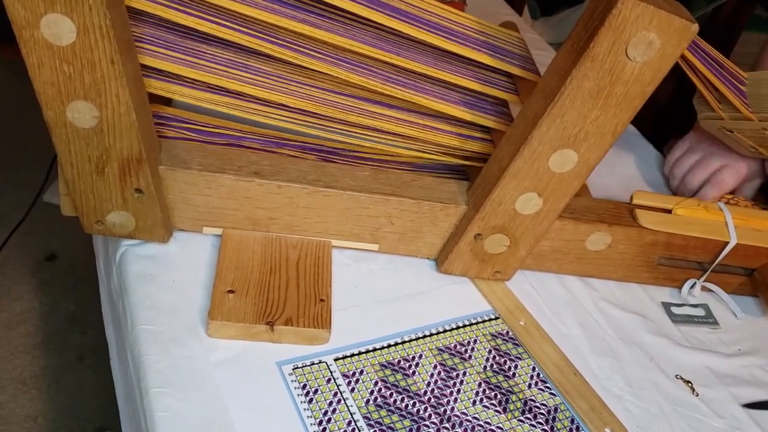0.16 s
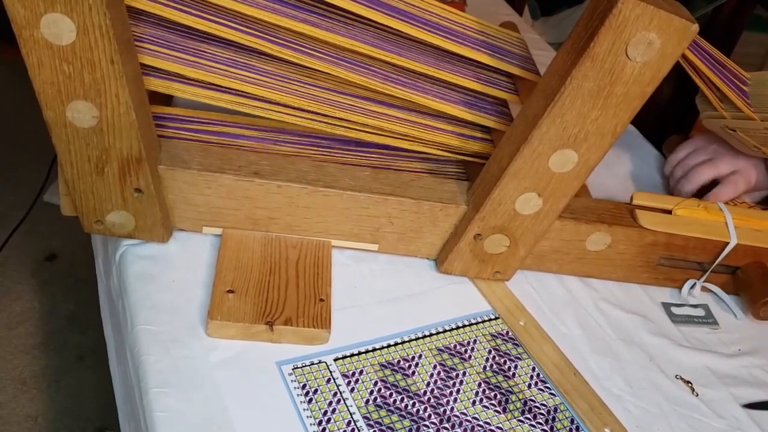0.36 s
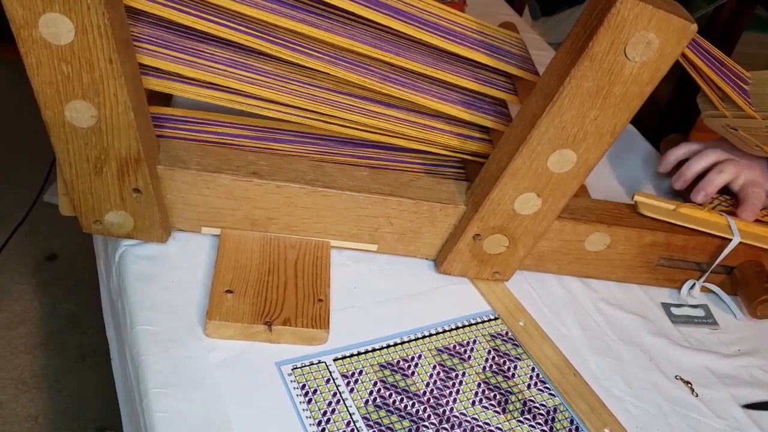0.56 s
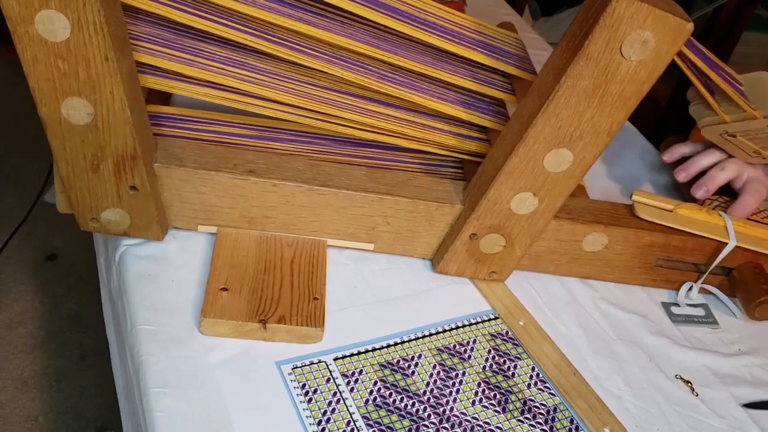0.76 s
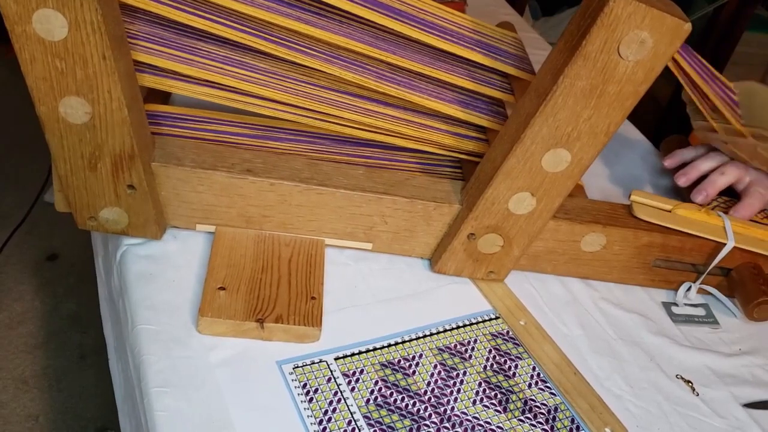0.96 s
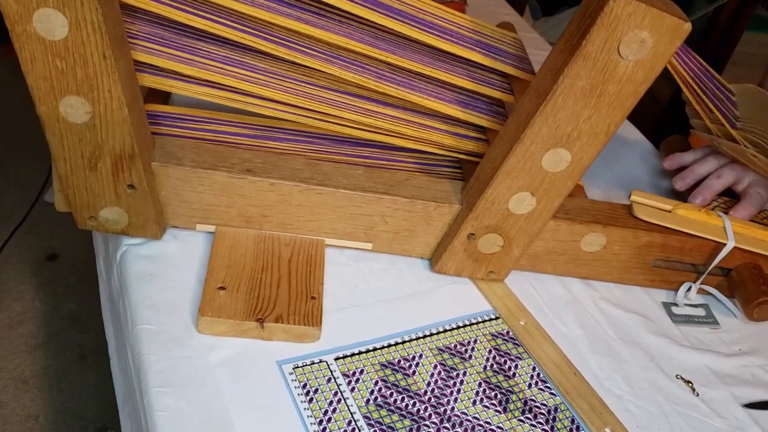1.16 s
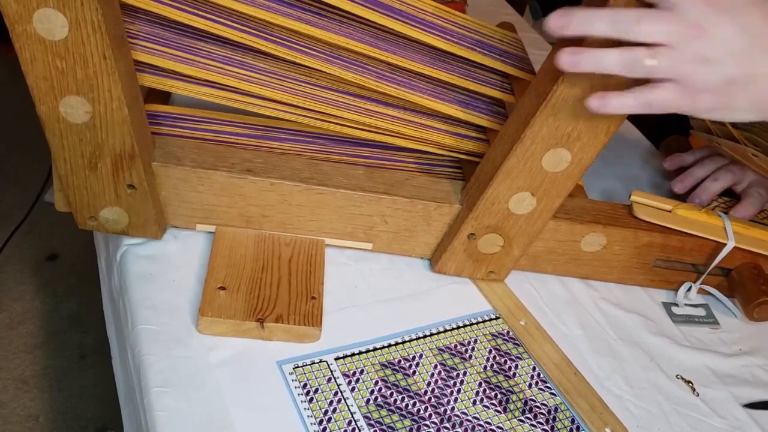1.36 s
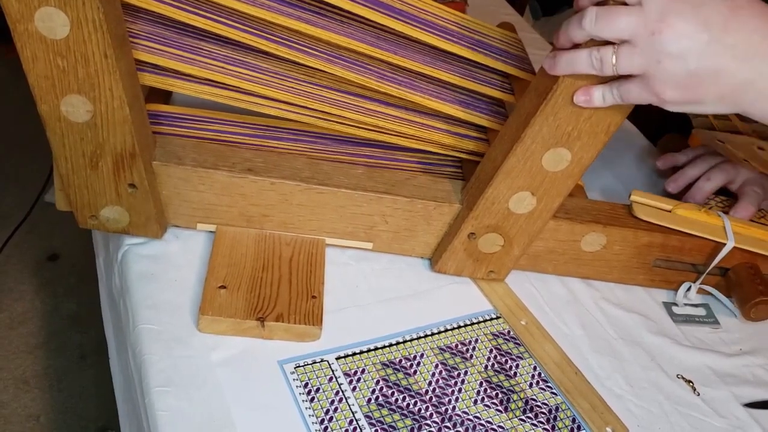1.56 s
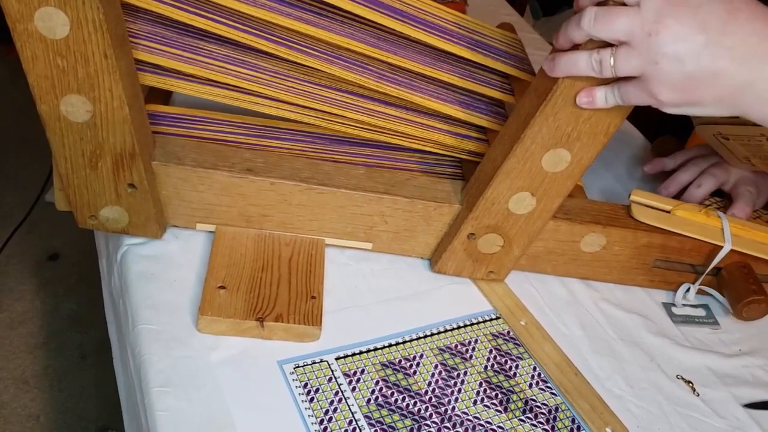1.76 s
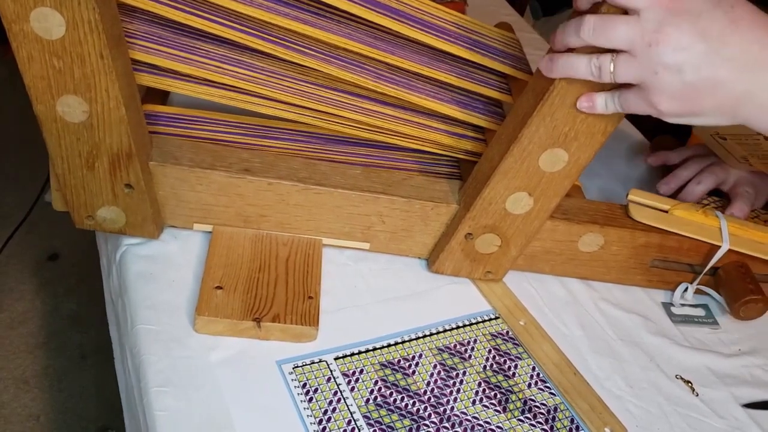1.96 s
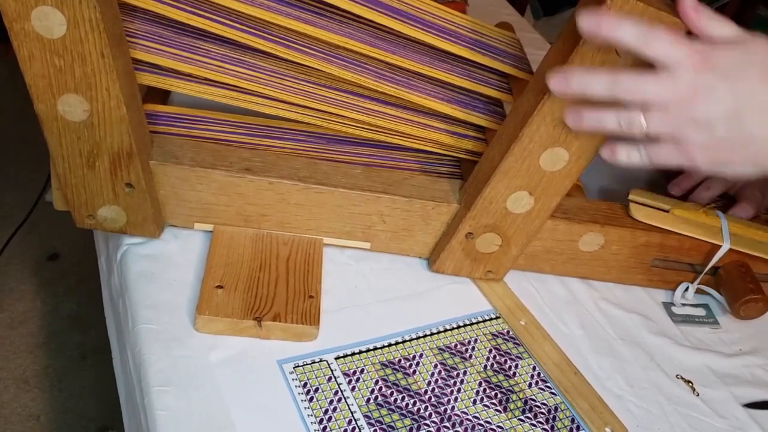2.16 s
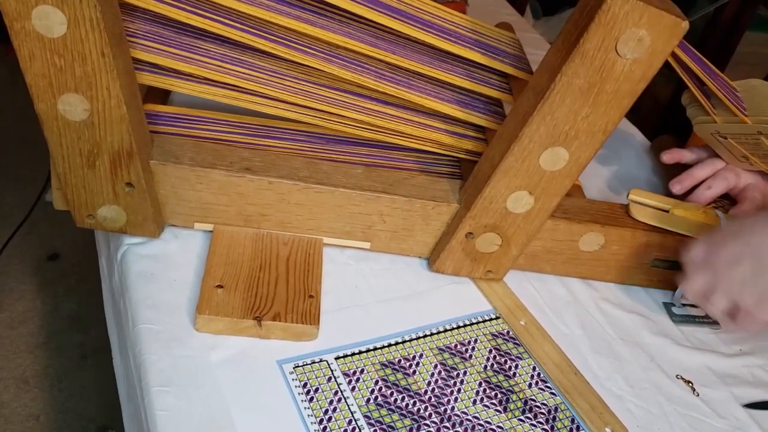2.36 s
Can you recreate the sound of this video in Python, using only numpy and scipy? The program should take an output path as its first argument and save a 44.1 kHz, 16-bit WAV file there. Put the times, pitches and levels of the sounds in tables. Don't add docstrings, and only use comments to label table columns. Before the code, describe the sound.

Two loud, hard knocks of wood on a band loom come in quick succession, then brief thread rustling and a thin, bright peg snap; faint bumps and rattles follow in a quiet room, close stereo microphones.

```python
import sys
import numpy as np
from scipy import signal
from scipy.fft import rfft, irfft
from scipy.io import wavfile
from scipy.ndimage import uniform_filter1d, minimum_filter1d

SR = 44100
rng = np.random.default_rng(int(sys.argv[2]) if len(sys.argv) > 2 else 0)


def file_out(sig):
    cols = np.atleast_2d(sig).T
    lim = np.clip(cols, -1, 1)
    pcm = np.round(lim * 32767).astype(np.int16)
    wavfile.write(sys.argv[1], SR, pcm)


def rack_gain(trim_db):
    fader = np.asarray(trim_db, float)
    return 10 ** (fader / 20)


N = 105840

# (frequency [Hz], bandwidth [Hz], level [dB])
PEG_MODES = [(4650, 180, 5.5), (6090, 810, -3.5), (7520, 517, -3), (9490, 690, -6), (11470, 360, 10),
             (14300, 640, -1), (15100, 500, -12.5)]
# (first tail [dB], second tail under it [dB])
ROOM_LEVELS = [(-23.5, -17), (-25, -28.5), (-33, -12.5)]
# (frequency [Hz], coherence [0-1])
DIFFUSE = [(60, 0.52), (300, 0.53), (1500, .01)]
# (frequency [Hz], coherence [0-1])
NEARBY = [(250, 0.81), (600, 0.25), (1500, 0.026)]


def evened(x):
    return x / np.sqrt(np.mean(x ** 2) + 1e-20)


def read(points, hz):
    f, value = np.transpose(points)
    return np.interp(np.log(hz + 1), np.log(f + 1), value)


def add(mix, s, sound):
    part = mix[..., round(s * SR):][..., :sound.shape[-1]]
    part += sound[..., :part.shape[-1]]


def colour(x, points):
    n = x.shape[-1]
    return irfft(rfft(x) * rack_gain(read(points, np.fft.rfftfreq(n, 1 / SR))), n)


def ring(x, peaks):
    out = 0
    for hz, width, db in peaks:
        r = np.exp(-np.pi * width / SR)
        angle = 2 * np.pi * min(hz, 20000) / SR
        out = out + rack_gain(db) * signal.lfilter([1 - r, 0, r - 1], [1, -2 * r * np.cos(angle), r * r], x)
    return out


def pair(x, balance, lag_s):
    hz = np.fft.rfftfreq(len(x), 1 / SR)
    half = rack_gain(read(balance, hz) / 2)
    left = half * np.exp(-2j * np.pi * hz * lag_s)
    return irfft(rfft(x) * np.array([left, 1 / half]), len(x))


def air(n, likeness):
    # (frequency [Hz], level [dB])
    port_left = [(3000, -8.5), (5800, -6.5), (6650, 0.5), (7400, -9.5), (9300, -13), (11500, -4),
                 (16000, 0.5)]
    port_right = [(3000, -10.5), (4600, -8.5), (6000, -15), (7700, -8.5), (9500, -13), (11700, -1),
                  (16000, 4.5)]
    a, b = rfft(rng.standard_normal((2, n)))
    hz = np.fft.rfftfreq(n, 1 / SR)
    same = np.clip(read(likeness, hz), 0, 1)
    left = a * rack_gain(read(port_left, hz))
    right = (same * a + np.sqrt(1 - same ** 2) * b) * rack_gain(read(port_right, hz))
    return irfft((hz < 15900) * np.array([left, right]), n)


def echo(points, late_db, peaks):
    # (frequency [Hz], t60 [s])
    room_t60 = [(300, 0.19), (3000, 0.19), (10000, .14), ]
    late_t60, rise_s, flat_db = 0.55, 0.0044, 3.5
    hz, t, z = signal.stft(air(SR, NEARBY), SR, nperseg=256)
    early = rack_gain(-60 * t / read(room_t60, hz)[:, None])
    late = rack_gain(late_db - 60 * t / late_t60)
    z = z * rack_gain(read(points, hz))[:, None] * (early + late)
    tail = signal.istft(z, SR, nperseg=256)[1][:, :SR]
    tail = rack_gain(flat_db) * tail + ring(tail, peaks)
    start_rms = np.sqrt(np.mean(tail[:, :2000] ** 2))
    return tail / start_rms * np.minimum(np.arange(SR) / SR / rise_s, 1)


def knock(blows, crack, balance, wood, rise_s, room, peaks, room_db, lag_s, low_hz, dull_db, top_db):
    out, hit = np.zeros((2, N)), np.zeros(N)
    t = np.arange(SR // 2) / SR
    main = max(blows, key=lambda b: b[1])[0]
    weaker = [(4000, 0.011), (8000, dull_db), (14400, dull_db), (15200, top_db)]
    for s, db, length in blows:
        grit = rng.standard_normal(2000) * np.exp(-t[:2000] / length) * np.minimum(t[:2000] / 0.00022, 1)
        if s != main:
            grit = colour(grit, weaker)
        add(hit, s, rack_gain(db) * grit)
    hit = ring(hit, crack) * rack_gain(12)
    hit = signal.lfilter(*signal.butter(4, low_hz, "high", fs=SR), hit)
    tones = 0
    for hz, db, t60 in wood:
        tones = tones + rack_gain(db - 60 * t / t60) * np.sin(2 * np.pi * (hz * t + rng.random()))
    add(hit, main, np.minimum(t / rise_s, 1) ** 2 * tones)
    add(out, main, rack_gain(room_db[0]) * echo(room, room_db[1], peaks))
    return out + pair(hit, balance, lag_s)


def first_knock():
    # (time [s], level [dB], decay [s])
    blows = [
        (.2158, -4.5, .0016),
        (.2232, -17, .0008),
        (.2258, -18.5, .0008),
    ]
    # (frequency [Hz], bandwidth [Hz], level [dB])
    crack = [(1330, 780, -9), (2640, 410, -6.5), (4170, 440, -7), (5890, 600, -7.5), (8400, 970, -6),
             (11800, 120, -15), (11800, 83, 1), (12410, 550, 4.5), (12990, 400, -1.5)]
    # (frequency [Hz], level [dB])
    balance = [(300, -5), (1000, 11), (3000, 21), (15000, -12)]
    # (frequency [Hz], level [dB], t60 [s])
    wood = [(739, -35, 0.18), (1780, -28, 0.076), (2597, -20.5, 0.036)]
    # (frequency [Hz], level [dB])
    room = [(250, -10.5), (600, -6.5), (2600, 0), (8000, -5), (13500, -5.5), (16000, -23)]
    # (frequency [Hz], bandwidth [Hz], level [dB])
    peaks = [(1137, 75, 5), (2663, 300, 5), (3950, 300, 7), (6400, 710, -2), (11500, 240, 5),
             (13970, 680, 8)]
    return knock(blows, crack, balance, wood, 0.004, room, peaks, ROOM_LEVELS[0], 0.00019,
                 low_hz=500, dull_db=3, top_db=-22)


def second_knock():
    # (time [s], level [dB], decay [s])
    blows = [
        (.3515, -35, 0.013),
        (.3585, -2.5, 0.0006),
        (.367, -22.5, 0.0034),
    ]
    # (frequency [Hz], bandwidth [Hz], level [dB])
    crack = [(1100, 380, -7), (2660, 480, 4), (3870, 150, 1), (6300, 900, -2.5), (8600, 590, -10),
             (12150, 800, -6.5), (13000, 290, 5)]
    # (frequency [Hz], level [dB])
    balance = [(300, 1), (1000, 11), (3000, 9.5), (15000, -6)]
    # (frequency [Hz], level [dB], t60 [s])
    wood = [(318, -27.5, 0.21), (463, -27.5, 0.17), (571.4, -29, 0.12), (1426, -25, 0.031),
            (1770, -20, 0.069), (2834, -37, 0.2)]
    # (frequency [Hz], level [dB])
    room = [(250, -2), (600, -3.5), (2000, -10.5), (12000, -21), (16000, -36)]
    # (frequency [Hz], bandwidth [Hz], level [dB])
    peaks = [(1130, 160, 2.2), (1830, 450, 5), (2754, 220, 11), (3823, 340, 8.9), (6500, 730, 3)]
    return knock(blows, crack, balance, wood, 0.0039, room, peaks, ROOM_LEVELS[1], 0.00019,
                 low_hz=494, dull_db=-14.5, top_db=-25)


def peg_snap():
    # (time [s], level [dB], decay [s])
    blows = [
        (.8672, -11, .001),
        (.8688, -7.5, .0013),
        (.877, -28, .003),
    ]
    # (frequency [Hz], level [dB])
    balance = [(1200, 4), (4500, -13), (6000, 6), (7700, -8), (9700, 6), (11700, -13), (15000, -9)]
    # (frequency [Hz], level [dB], t60 [s])
    wood = [(1218, -31, .145), (840, -38, .07)]
    # (frequency [Hz], level [dB])
    room = [(1000, -15), (3100, -13), (4500, -2), (9500, -2), (16000, -10)]
    # (frequency [Hz], bandwidth [Hz], level [dB])
    peaks = [(3890, 196.3, 2.9), (4645, 390, 6.1), (7500, 400, 7.6), (9700, 350, 12), (11900, 355, 8),
             (15500, 560, 6)]
    return knock(blows, PEG_MODES, balance, wood, 0.014, room, peaks, ROOM_LEVELS[2], -0.0005,
                 low_hz=4150, dull_db=-5.4, top_db=-2.5)


def peg_slips():
    # (time [s], level [dB])
    slips = [
        (0.8382, -55.5),
        (0.8427, -46),
    ]
    out, t = np.zeros((2, N)), np.arange(2000) / SR
    for s, db in slips:
        grit = rng.standard_normal(2000) * np.exp(-t / 0.0015)
        slip = colour(ring(grit, PEG_MODES), [(3800, -22.5), (4300, 8.5), (12500, 0.5), (14500, -13.5)])
        add(out, s, rack_gain(db + 6) * slip * np.ones((2, 1)))
    return out


def frame():
    # (frequency [Hz], bandwidth [Hz], level [dB])
    modes = [(60.6, 33, 1.5), (94, 8.4, 8), (135, 41.5, 17), (190, 62, 9.5), (303, 29, 8.5),
             (460, 90, -38.5)]
    # (time [s], level [dB])
    shake = [(0, -69.5), (.7, -56), (0.821, -79.5), (2.4, -69)]
    # (time [s], peak level [dB], frequency [Hz])
    bumps = [(0.069, -47.5, 135.5), (0.216, -22, 341.5), (0.245, -24, 135.6), (0.271, -29.5, 140),
             (0.367, -24, 318), (0.384, -18, 318), (0.41, -25, 164), (0.512, -26.5, 133), (0.531, -27, 159),
             (0.55, -50, 135), (0.58, -50, 200), (.6, -47, 190), (0.626, -47, 135.5), (0.645, -32, 293),
             (0.677, -49.5, 121.3), (0.714, -52, 208), (0.984, -51.5, 121.3), (1.531, -47.5, 109.9),
             (1.543, -41, 94.3), (1.577, -43.5, 237), (1.599, -48, 117), (1.625, -47.5, 87),
             (1.651, -48.5, 130), (1.908, -51.5, 94.1), (2.014, -44.5, 176.3), (2.032, -39, 153),
             (2.11, -49, 110.3), (2.133, -50, 126.7), (2.257, -46, 153)]
    rise_s, thud_cycles, shudder_db, shudder_t60 = 0.0078, 14, -10, 0.16
    t = np.arange(SR // 2) / SR
    s, db = np.transpose(shake)
    load, thuds = rack_gain(np.interp(np.arange(N) / SR, s, db)), np.zeros(N)
    rise = np.minimum(t / rise_s, 1)
    for s, db, hz in bumps:
        add(thuds, s, rack_gain(db + 1.5 - 60 * t * hz / thud_cycles) * rise * np.sin(2 * np.pi * hz * t))
        add(load, s, rack_gain(db + shudder_db - 60 * t / shudder_t60) * rise)
    tremble = ring(rng.standard_normal(N), modes)
    tremble = evened(colour(tremble, [(25, -19.5), (55, 3), (500, -2), (1500, -38)]))
    return thuds + load * tremble


def finger_taps():
    # (time [s], level [dB], frequency [Hz])
    taps = [(.512, -36, 420), (.655, -41, 600), (1.55, -40.5, 419), (1.983, -51, 796), (2.0185, -42, 600)]
    out, t = np.zeros((2, N)), np.arange(SR // 2) / SR
    for s, db, hz in taps:
        add(out, s, rack_gain(db - 60 * t * hz / 4.5) * np.sin(2 * np.pi * hz * t) * np.ones((2, 1)))
    return out


def pegs():
    # (time [s], level [dB], t60 [s], brightness [dB])
    rattles = [(.32, -44.5, 0.72, -1), (0.513, -35, 0.13, -26), (.645, -51, 0.22, -56),
               (1.42, -51.5, 0.28, 4), (1.547, -49.5, 0.16, -42), (1.736, -52.5, 0.11, -16),
               (1.982, -49, 0.091, -38), (2.017, -35.5, 0.036, -43.5), (2.328, -52, 0.41, -7.5)]
    # (frequency [Hz], bandwidth [Hz], level [dB])
    low_modes = [(408, 77, 18.6), (575, 170, 4)]
    high_modes = [(922, 40, 0.5), (740, 150, -8.5)]
    out, t = np.zeros((2, N)), np.arange(SR // 2) / SR
    for s, db, t60, bright_db in rattles:
        chatter = colour(air(len(t), NEARBY), [(1200, -1), (3000, -23)])
        body = evened(ring(chatter, low_modes)) + rack_gain(bright_db) * evened(ring(chatter, high_modes))
        add(out, s, rack_gain(db - 60 * t / t60) * np.minimum(t / 0.016, 1) * body)
    return out


def ticks():
    # (time [s], level [dB], frequency [Hz], t60 [s])
    peg_ticks = [(0.673, -34.5, 12500, .004), (.842, -48.5, 4700, 0.0088), (1.531, -50, 2580, 0.049),
                 (1.7, -64.5, 2340, 0.18)]
    out, t = np.zeros((2, N)), np.arange(SR // 2) / SR
    for s, db, hz, t60 in peg_ticks:
        body = ring(air(len(t), DIFFUSE), [(hz, 0.062 * hz, 0)])
        body = evened(ring(body, [(hz, 0.07 * hz, 0)]))
        add(out, s, rack_gain(db - 60 * t / t60) * body)
    return out


def buzzes():
    # (time [s], frequency [Hz], bandwidth [Hz], level [dB], t60 [s])
    loose_parts = [(0.21, 1090, 42, -38.5, .28), (.235, 2700, 80, -42.5, 0.43),
                   (0.21, 3300, 140, -45, 0.28), (.218, 1400, 60, -45, .18), (0.39, 3800, 690, -45.5, 0.32),
                   (0.41, 890, 54, -61, 0.18), (0.39, 3200, 130, -51, .3), (.51, 2300, 280, -56, 0.1),
                   (.93, 14000, 3000, -53.5, 0.8), (.868, 840, 150, -44, 0.061),
                   (.868, 2250, 900, -50.5, 0.05), (0.89, 1060, 500, -60, 0.28),
                   (1.422, 550, 310, -56, 0.33), (1.424, 2340, 1200, -66, .12),
                   (1.545, 2400, 500, -67.5, 0.26), (1.548, 750, 300, -62, 0.062),
                   (1.615, 740, 200, -61, 0.091), (1.685, 750, 200, -63.5, 0.13),
                   (1.67, 2400, 170, -71.5, .4), (1.72, 3100, 530, -71, 0.35),
                   (.95, 6500, 900, -62.5, 0.78), (2.03, 680, 300, -62, 0.33), (1.1, 1500, 750, -68, 0.51)]
    out, t = np.zeros((2, N)), np.arange(SR // 2) / SR
    for s, hz, width, db, t60 in loose_parts:
        body = ring(air(len(t), NEARBY), [(hz, width, 0)])
        body = evened(ring(body, [(hz, 2 * width, 0)]))
        add(out, s, rack_gain(db - 60 * t / t60) * np.minimum(t / 0.0036, 1) * body)
    return out


def threads():
    # (start [s], length [s], level [dB], dullness [0-1])
    strokes = [(0.613, 0.066, -46, 0.03), (0.639, 0.12, -53.5, 0.1), (0.761, 0.3, -55.5, 0.47),
               (0.058, 0.3, -65.5, 0.6), (0.459, .13, -59, 1), (1.619, 0.31, -62.5, 0.8),
               (2.038, 0.14, -63.5, 0.93), (2.15, 0.24, -64, 0.67), (2.267, 0.096, -70.5, 0.27)]
    # (frequency [Hz], level [dB])
    band = [(2500, -31), (3500, -14.5), (4500, 4.5), (16000, -3.5)]
    # (frequency [Hz], level [dB])
    cloth = [(1500, -3), (2400, -5.5), (5500, -10.5), (6600, 0.5), (8000, -14.5)]
    out = np.zeros((2, N))
    for s, length, db, dull in strokes:
        u = np.linspace(0, 1, round(length * SR))
        flicker_db = 3.2 * evened(uniform_filter1d(rng.standard_normal(14000), size=120))
        fibres = air(14000, DIFFUSE) * rack_gain(flicker_db)
        rub = (1 - dull) * evened(colour(fibres, band)) + dull * evened(colour(fibres, cloth))
        add(out, s, rack_gain(db) * np.sin(np.pi * u ** 0.66) * rub[:, :len(u)])
    return out


def room_air():
    # (frequency [Hz], level [dB])
    hum = [(20, -15), (60, 1.5), (150, -5), (500, -17.5), (1500, -22.5), (3500, -25.5), (6000, -52)]
    return rack_gain(-64) * evened(colour(air(N, DIFFUSE), hum))


def hiss():
    return rack_gain(-65.5) * evened(colour(air(N, DIFFUSE), [(1500, -13.5), (3000, -5)]))


def scene():
    impacts = first_knock() + second_knock() + peg_snap() + peg_slips()
    wood = frame() + finger_taps() + pegs() + ticks() + buzzes()
    return impacts + wood + threads() + room_air()


def roll_off(x):
    return signal.sosfilt(signal.butter(12, 17150, fs=SR, output="sos"), x)


def record(dry):
    x = dry + hiss()
    low_pass = signal.firwin(255, 17000, window=("kaiser", 9), fs=SR)
    x = signal.oaconvolve(x, low_pass[None], "same")
    peak = -minimum_filter1d(-abs(x).max(0), size=200)
    peak = uniform_filter1d(peak, size=100)
    return roll_off(x / np.maximum(peak, 1))


dry = scene()
out = record(dry)
file_out(out)
```